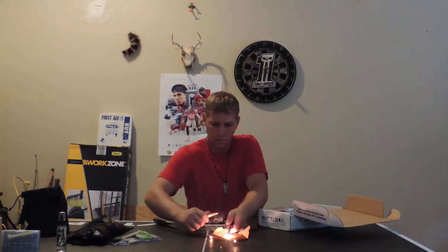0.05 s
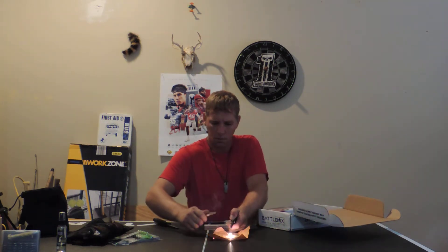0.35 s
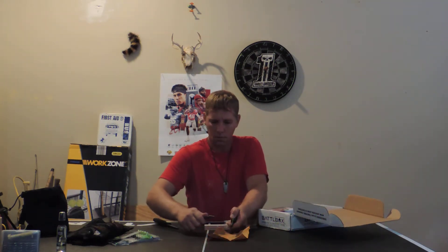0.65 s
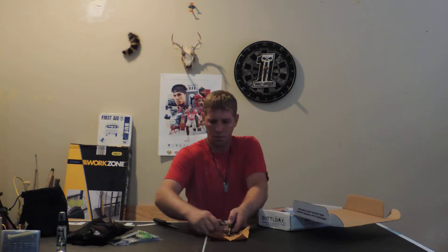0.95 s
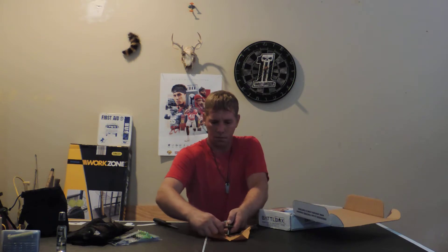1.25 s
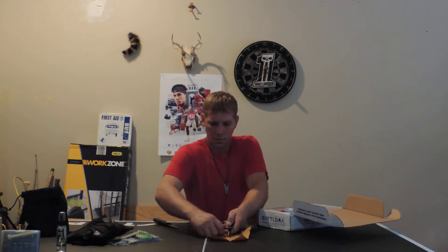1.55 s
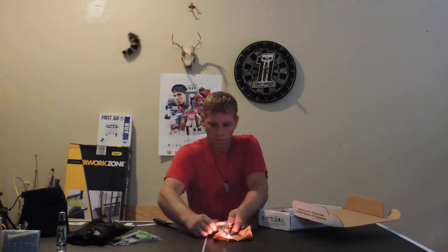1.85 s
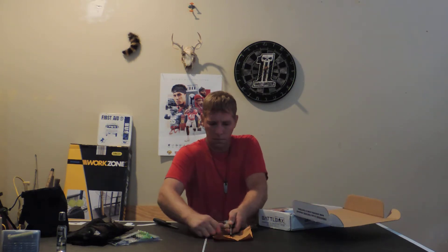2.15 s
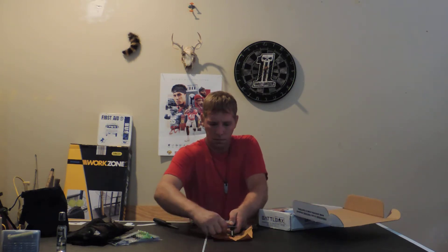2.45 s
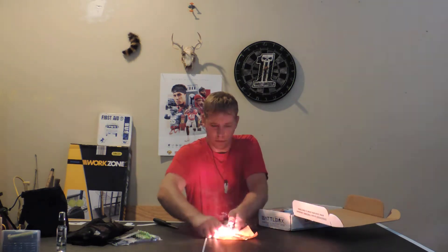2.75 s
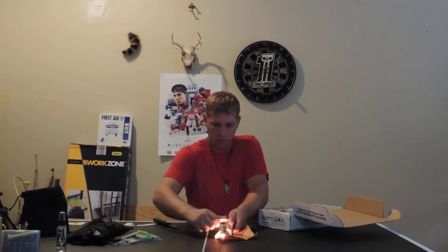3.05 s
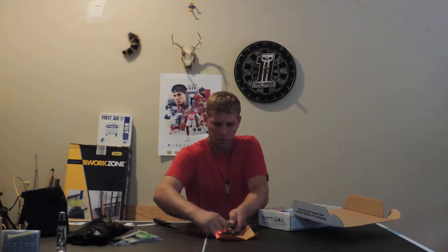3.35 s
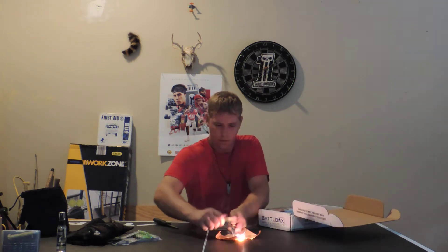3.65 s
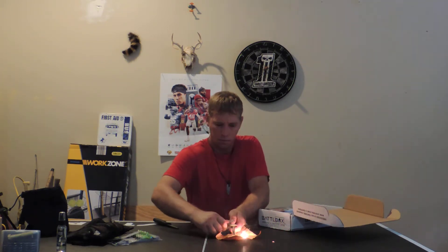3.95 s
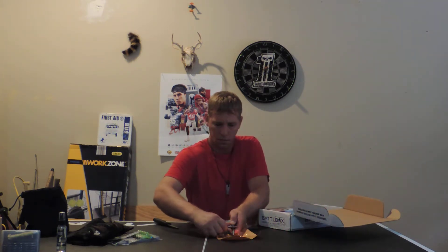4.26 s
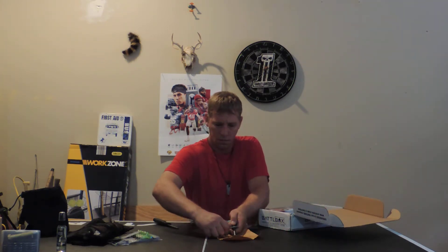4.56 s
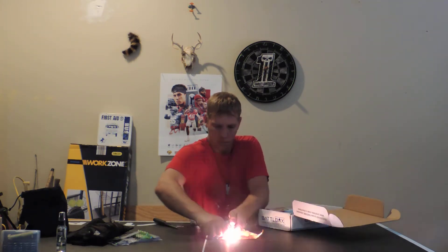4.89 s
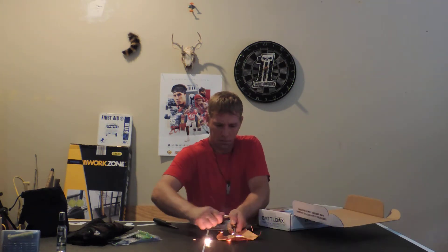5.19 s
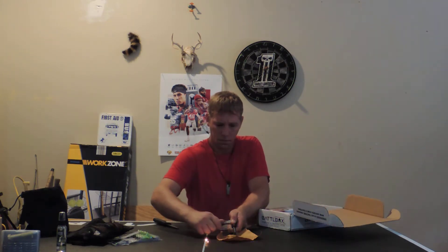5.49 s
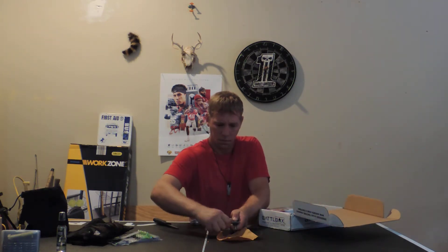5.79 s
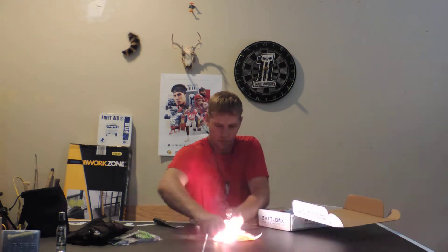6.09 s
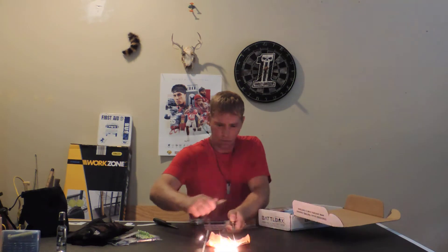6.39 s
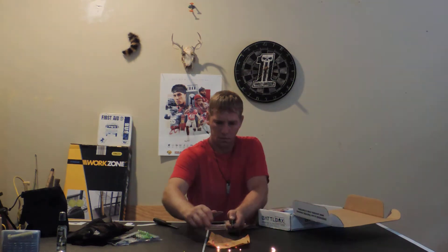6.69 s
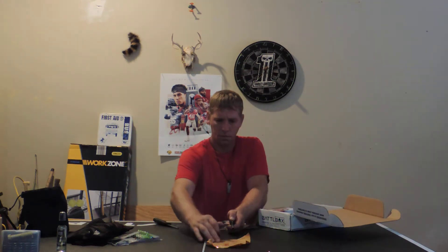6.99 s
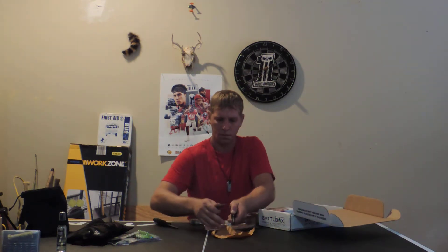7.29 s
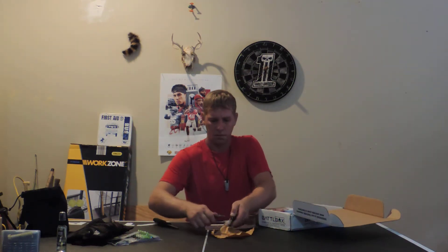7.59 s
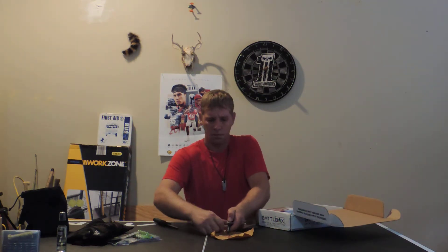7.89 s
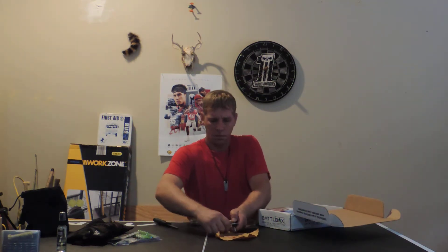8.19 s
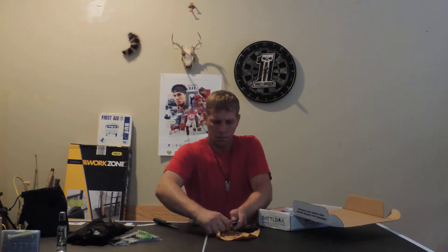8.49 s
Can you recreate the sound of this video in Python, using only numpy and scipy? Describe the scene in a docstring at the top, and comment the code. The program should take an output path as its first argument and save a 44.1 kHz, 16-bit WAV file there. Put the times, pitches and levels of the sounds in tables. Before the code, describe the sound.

A steel striker scrapes a fire-starter rod over a table in a bare, echoing garage, a few metres from the microphone. Quiet room air and a thin high whine run throughout. Two faint scrapes come in the first half second, while a soft rush with a few light bumps swells around 1 second. The striker ticks onto the rod at 1.2 seconds, and a short rasp ends in a sharp ringing knock at 1.9. Lighter scrapes follow at 2.8 and 3.7, with metal ticks at 2.5, 3.3 and 4.3. Another rasp ends in a hard knock at 5 seconds. After a tick at 5.8, the loudest scrape and knock land at 6.2, followed by a dull thump of a hand on the table. Paper slides softly at 7.1, and small clinks with a light knock come near 7.9.

```python
"""Short rasping scrapes: a steel striker shaves sparks off a fire-starter rod, over a table in a bare
garage, a few metres from the microphone. The striker is set on the rod with a tick; hard strokes end
in a knock that rings rod and table. The tinder paper slides over the table once.
Room air, a thin whine and a soft rush with a few bumps lie underneath."""
import sys
import numpy as np
from scipy import signal
from scipy.fft import rfft, irfft, next_fast_len
from scipy.io import wavfile

SR = 44100
rng = np.random.default_rng(int(sys.argv[2]) if len(sys.argv) > 2 else 0)


def log_audio(samples):
    """Write samples as a 16-bit WAV file to the path given in sys.argv[1]."""
    # one column per channel
    frames = np.atleast_2d(samples).T
    # limit to full scale, then quantise
    limited = np.clip(frames, -1, 1)
    pcm = np.round(limited * 32767).astype(np.int16)
    wavfile.write(sys.argv[1], SR, pcm)


N = 376613
T = np.arange(N) / SR
WALL_ECHO_S, CEILING_ECHO_S = 0.006, 0.0136

# garage reverberation: freq_hz, t60_s, level_db, stereo_coherence
REVERB_BANDS = [(99, 0.41, 4.5, 0.87), (303, 0.6, 7, 0.83), (690, 0.58, 7.5, 0.83), (1420, 0.7, 13, 0.55),
                (2980, 0.6, 9, 0.04), (6800, 0.61, 9, 0.07), (14000, 0.47, 5, 0)]
# broad ring of the fist-damped rod: freq_hz, level_db
ROD_SPECTRUM = [(900, -24), (1500, -5.5), (1950, 0), (2850, 12.5), (3450, 9.5), (3900, 3), (4600, -6),
                (9000, -63)]
# steel contact snap: freq_hz, level_db
SNAP_SPECTRUM = [(1000, -41.5), (3700, -6), (5300, 5), (7000, -2), (10000, -3.5), (14000, -16.5)]


def undb(db):
    """Decibels to gain."""
    return 10 ** (np.asarray(db) / 20)


def unit(x):
    """Scale to rms 1."""
    return x / np.sqrt(np.mean(x ** 2))


def ramp(start_s, length_s):
    """Linear rise from 0 to 1."""
    return np.clip((T - start_s) / max(length_s, 1e-4), 0, 1)


def swell(start_s, attack_s, release_s):
    """Rise to 1, fall to 0."""
    return ramp(start_s, attack_s) - ramp(start_s + attack_s, release_s)


def drift(rate_hz):
    """Smooth random drift."""
    return 1.48 * np.interp(T * rate_hz, np.arange(N // 20), rng.standard_normal(N // 20))


def delayed(x, delay_s):
    """Same sound by a longer path."""
    return np.pad(x, (int(delay_s * SR), 0))[:N]


def over_pitch(hz, rows, column=1):
    """Interpolate a column over log frequency."""
    rows = np.array(rows, float)
    return np.interp(np.log(np.maximum(hz, 1)), np.log(rows[:, 0]), rows[:, column])


def response(spectrum, size=4096):
    """Minimum-phase impulse response from rows of freq_hz, level_db."""
    gain = undb(over_pitch(np.fft.rfftfreq(size, 1 / SR), spectrum))
    cepstrum = irfft(np.log(gain))
    cepstrum[1:size // 2] *= 2
    cepstrum[size // 2 + 1:] = 0
    return irfft(np.exp(rfft(cepstrum)))


def ring(modes, order=1, size=4096):
    """Impulse response of modes, neighbours in antiphase; order 2 steepens the skirts."""
    s = 1j * np.fft.rfftfreq(size, 1 / SR)
    shapes = [undb(db) * (s * width_hz / (s * s + s * width_hz + hz * hz)) ** order
              for hz, width_hz, db in modes]
    return irfft(sum(shapes[::2]) - sum(shapes[1::2]))


def drive(force, body):
    """Sound of a body under a force."""
    return signal.oaconvolve(force, body)[:N]


def blows(rows, body, db_column=1):
    """One blow per row: start_s in column 0, peak level in db_column."""
    out = np.zeros(N + len(body))
    body = body / np.abs(body).max()
    for row in rows:
        i = int(np.clip(row[0] * SR, 0, N))
        out[i:i + len(body)] += undb(row[db_column]) * body
    return out[:N]


def friction(grain_db, judder_db, judder_hz):
    """Dense, uneven micro-fractures, bunched by stick-slip."""
    sizes = undb(grain_db * np.minimum(rng.exponential(size=N), 5))
    grains = rng.standard_normal(N) * sizes * (rng.random(N) < .25)
    return unit(grains * undb(judder_db * drift(judder_hz)))


def diffuse(size):
    """Stereo noise from all sides: coherent bass, unrelated treble."""
    hz = np.fft.rfftfreq(size, 1 / SR)
    coherence = np.clip(over_pitch(hz, REVERB_BANDS, column=3), 0, 1)
    mid, side = rfft(rng.standard_normal((2, size)))
    mid, side = mid * np.sqrt((1 + coherence) / 2), side * np.sqrt((1 - coherence) / 2)
    return irfft([mid + side, mid - side], size)


def steady_noise(spectrum):
    """Coloured diffuse noise, rms 1."""
    body = response(spectrum)
    return unit(np.array([drive(side, body) for side in diffuse(next_fast_len(N))]))


def garage(x, size=24576, hop=1280):
    """Direct sound, echoes off table, wall and ceiling, then a diffuse tail, longest in the mids."""
    table_echo_s, build_up_s = 0.0022, 0.00047
    early = (0.33 * delayed(x, table_echo_s) + 0.37 * delayed(x, WALL_ECHO_S)
             + 0.32 * delayed(x, CEILING_ECHO_S))
    hz, t = np.fft.rfftfreq(10 * size, 1 / SR), T[:size]
    field, bands = rfft(diffuse(10 * size)), []
    for k, (_, t60_s, db, _) in enumerate(REVERB_BANDS):
        share = over_pitch(hz, [(row[0], j == k) for j, row in enumerate(REVERB_BANDS)])
        decay = np.exp(-np.log(1000) * t / t60_s) * (1 - np.exp(-t / build_up_s))
        bands.append((irfft(field * share), undb(db) * decay / np.linalg.norm(decay)))
    # moving hands: each frame meets different late reflections
    padded, late = np.pad(x, (hop, 2 * hop)), np.zeros((2, N + 2 * size))
    window = signal.windows.cosine(2 * hop)
    starts = np.arange(0, N + hop, hop)
    for i, pick in zip(starts, rng.integers(0, 9 * size, len(starts))):
        frame = padded[i:i + len(window)] * window
        if np.abs(frame).max() > undb(-66):
            tail = sum(noise[:, pick:pick + size] * decay for noise, decay in bands)
            wash = signal.fftconvolve(tail, [frame])
            late[:, i:i + wash.shape[1]] += wash
    return x + early + late[:, hop:hop + N]


def background():
    """Steady room air, a narrow whine and a fluttering rush that swells and sinks."""
    # noise spectra: freq_hz, level_db
    air = [(20, 5), (45, 0), (100, -0.5), (150, -1.5), (280, -6), (600, -9), (820, -6.5), (1250, -15),
           (2000, -18), (4000, -17), (6000, -17), (10000, -21), (14000, -17)]
    whine = [(6000, -53), (6800, -15), (7300, -4.5), (7650, -0.5), (7980, 0.5), (8300, -4.5), (8800, -17),
             (10000, -32.5)]
    rush = [(100, -4), (350, -11.5), (550, -9), (780, 0.5), (1050, -4.5), (1400, -8), (2200, -13),
            (3500, -22), (8000, -64)]
    peak_s, width_s, rest_db, rise_db, flutter_db = 1, 0.99, -59, 17.5, 1.17
    bell = np.exp(-.5 * ((T - peak_s) / width_s) ** 2)
    rush_db = rest_db + rise_db * bell + flutter_db * drift(rate_hz=20)
    bed = undb(-46) * steady_noise(air) + undb(-46.5) * steady_noise(whine)
    return bed + undb(rush_db) * steady_noise(rush)


def bumps():
    """Soft bumps within the rush, on one broad resonance."""
    # bumps: start_s, peak_db
    hits = [(0.335, -37), (0.782, -37), (0.996, -48), (1.082, -32.5)]
    # resonance: pitch_hz, width_hz, level_db
    modes = [(850, 440, 0)]
    return blows(hits, ring(modes, order=2))


def paper():
    """Tinder paper slides on the table: a fine hiss that rises, holds and fades as it slows."""
    # paper hiss: freq_hz, level_db
    spectrum = [(300, -20), (900, -9), (2000, -14), (3000, -4), (4200, 2), (6000, 2.5), (8200, 3),
                (10000, 1.5), (14000, 0.5)]
    start_s, attack_s, hold_s, level_db, fade_db_per_s = 7.105, 0.074, 0.11, -40.5, 99
    rubbing = friction(grain_db=1.5, judder_db=1, judder_hz=90)
    slowing_s = np.maximum(T - start_s - attack_s - hold_s, 0)
    envelope = ramp(start_s, attack_s) * undb(level_db - fade_db_per_s * slowing_s)
    return envelope * unit(drive(rubbing, response(spectrum)))


def table_top():
    """Impulse response of the table, reached through hand and paper."""
    # table top: pitch_hz, width_hz, level_db
    modes = [(174, 165, -11), (290, 92, -3.5), (430, 166, -5.5), (659, 112, 0.5), (912, 277, -1),
             (1100, 395, -2), (1680, 1540, -9.5), (1945, 143, -2.5)]
    # contact colour, deep bass thinned, top slightly lifted: freq_hz, gain_db
    contact_colour = [(60, -15.5), (150, -2.5), (2400, 0.5), (4500, -3), (12000, 3)]
    return drive(ring(modes), response(contact_colour))


def clinks():
    """The loose striker clinks as the hands regrip."""
    # clinks: start_s, peak_db
    hits = [(7.900, -38), (7.961, -39)]
    # loose striker: pitch_hz, width_hz, level_db
    modes = [(5570, 150, 0)]
    return blows(hits, ring(modes))


def ticks():
    """Light contacts snap and ring the flat striker, which throws much of its ring at the back wall."""
    # striker set on the rod: start_s, snap_db, high_ring_db
    contacts = [(1.1729, -18.5, -14), (2.437, -42, -55), (2.473, -36, -36), (3.3113, -20.5, -19),
                (4.3262, -19, -16), (5.7618, -18.5, -19.5), (7.893, -29, -48), (7.9604, -25, -29)]
    # striker modes: pitch_hz, width_hz, level_db
    low_modes = [(2665, 215, 0)]
    high_modes = [(6300, 860, 1), (7840, 340, 27)]
    # soft ticks are duller: the low ring falls less than the snap
    low_hits = [(start_s, -29.5 + 0.43 * snap_db) for start_s, snap_db, _ in contacts]
    rings = blows(low_hits, ring(low_modes)) + blows(contacts, ring(high_modes), db_column=2)
    snaps = blows(contacts, response(SNAP_SPECTRUM))
    return snaps + undb(-0.5) * rings + delayed(rings, WALL_ECHO_S)


def thumps():
    """The heel of the hand lands on the table."""
    # landings: start_s, peak_db
    hits = [(6.374, -22), (6.397, -20)]
    # table under the hand: pitch_hz, width_hz, level_db
    modes = [(139, 58, -16.5), (265, 136, 3)]
    return blows(hits, ring(modes, order=2))


def knocks():
    """Hard strokes end by striking rod and table; the table's knock returns off the ceiling."""
    # end-of-stroke impacts: start_s, rod_db, table_db, snap_db
    hits = [(1.8560, -8, -10, -11), (5.0165, -20, -38, -39), (5.0478, -2.3, -9.5, -12.5),
            (6.2228, -22, -48, -10), (6.2273, 0.1, -9, -3.5), (7.9345, -36, -22.5, -43)]
    rod = blows(hits, response(ROD_SPECTRUM))
    table = blows(hits, table_top(), db_column=2)
    snaps = blows(hits, response(SNAP_SPECTRUM), db_column=3)
    return rod + snaps + table + undb(-3.5) * delayed(table, CEILING_ECHO_S)


def scrapes():
    """The striker shaves the rod: the rasp follows speed, rod ring and table rumble follow pressure."""
    # strokes: start_s, run_up_s, run_out_s, rasp_db, rod_db, table_db
    strokes = [(-0.06, 0.055, 0.028, -46, -44.5, -40.5), (0.47, 0.032, 0.0047, -44, -65, -70),
               (1.785, 0.077, 0.0034, -32.5, -45, -50.5), (2.768, 0.1, 0.088, -35.5, -47, -48),
               (3.641, 0.033, 0.1, -33, -45, -56.5), (4.972, 0.09, 0.003, -33.5, -44.5, -48.5),
               (6.18, 0.074, 0.025, -28, -57, -75), (6.286, 0.018, 0.019, -34, -28.5, -27)]
    # rasp of the sparks: freq_hz, level_db
    rasp_spectrum = [(300, -7.5), (1500, -12.5), (2500, -12.5), (3500, -5.5), (5000, -1.5), (6500, -0.5),
                     (8200, 1), (10000, -0.5), (14000, -0.5)]
    # path through the fist to the table: freq_hz, gain_db
    fist = [(120, 1.5), (300, 8), (700, 2), (1200, -0.5), (2500, -13.5)]
    # catching edge: pitch_hz, width_hz, level_db
    grate_modes = [(3530, 820, 0), (5400, 440, -5)]
    bite_s, rasp_exponent = 0.015, 1.19
    force = friction(grain_db=-2, judder_db=3, judder_hz=258)
    rasp = unit(drive(force, response(rasp_spectrum)))
    rod = unit(drive(force, response(ROD_SPECTRUM)))
    table = unit(drive(force, drive(table_top(), response(fist))))
    grate = unit(drive(force, ring(grate_modes, order=2)))
    # one light stroke: the fist shifts on the table, then the edge catches and grates
    out = undb(-46.5) * table * swell(start_s=3.581, attack_s=0.027, release_s=0.12)
    out += undb(-37) * grate * swell(start_s=3.674, attack_s=0.0045, release_s=0.031)
    for start_s, run_up_s, run_out_s, rasp_db, rod_db, table_db in strokes:
        contact = 1 - ramp(start_s + run_up_s, run_out_s)
        speed = np.sin(np.pi / 2 * ramp(start_s, run_up_s) * contact)
        pressure = ramp(start_s, bite_s) * contact
        out += undb(rasp_db) * rasp * speed ** rasp_exponent
        out += (undb(rod_db) * rod + undb(table_db) * table) * pressure
    return out


def scene():
    """Sources through the garage, over the background."""
    sources = scrapes() + knocks() + thumps() + ticks() + clinks() + paper() + bumps()
    return garage(sources) + background()


def record(dry):
    """Microphone pair: slightly unequal colour, rounded peaks, top cut."""
    # channel imbalance: freq_hz, left_minus_right_db
    imbalance = [(40, -0.2), (200, -2.5), (3000, -2), (6000, -1.5), (7800, -5), (9500, 0), (13000, 1)]
    clip_level, cutoff_hz = .88, 14150
    colours = [response([(hz, sign * db / 2) for hz, db in imbalance]) for sign in (1, -1)]
    stereo = np.array([drive(side, colour) for side, colour in zip(dry, colours)])
    rounded = stereo / (1 + (stereo / clip_level) ** 6) ** (1 / 6)
    lowpass = signal.ellip(12, .1, 70, cutoff_hz, fs=SR, output="sos")
    return signal.sosfilt(lowpass, rounded)


dry = scene()
out = record(dry)
log_audio(out)
```